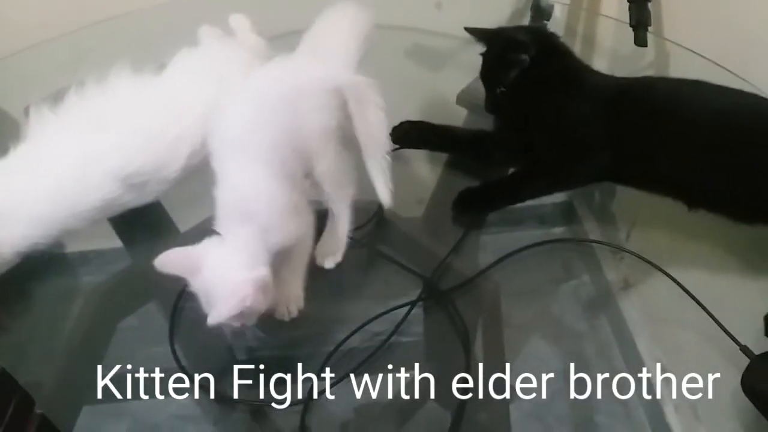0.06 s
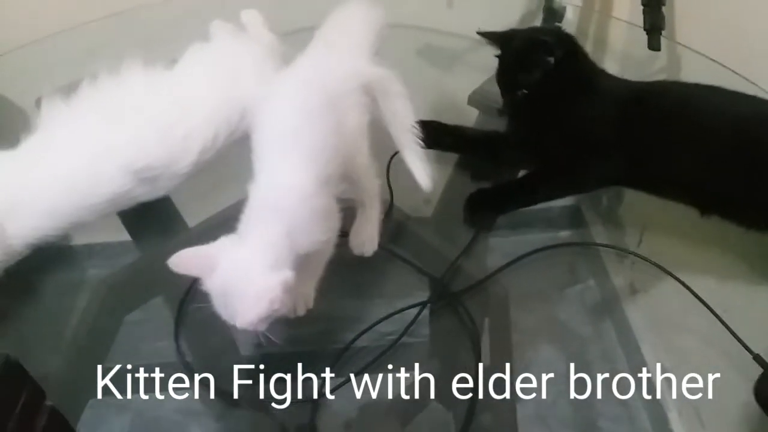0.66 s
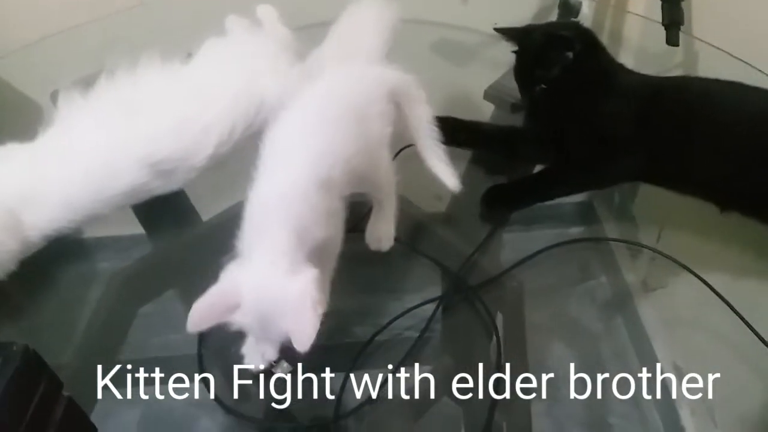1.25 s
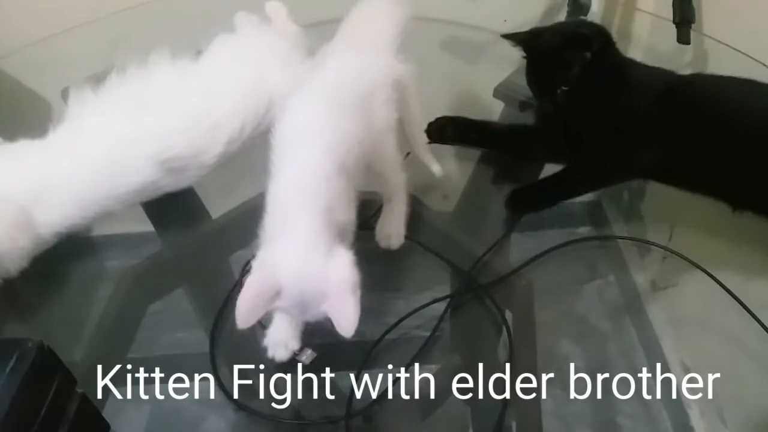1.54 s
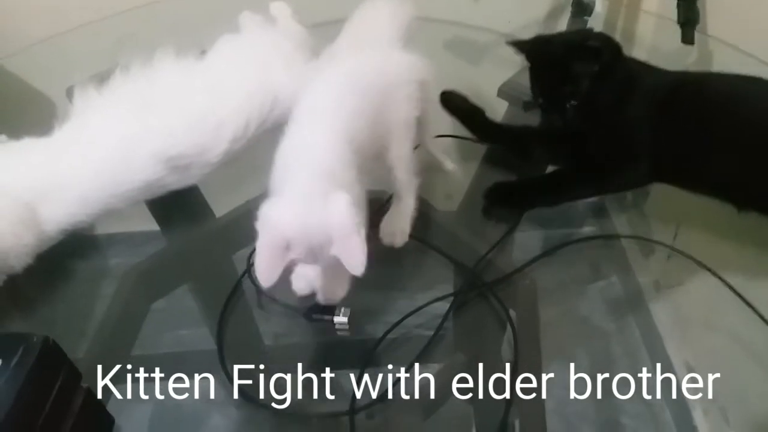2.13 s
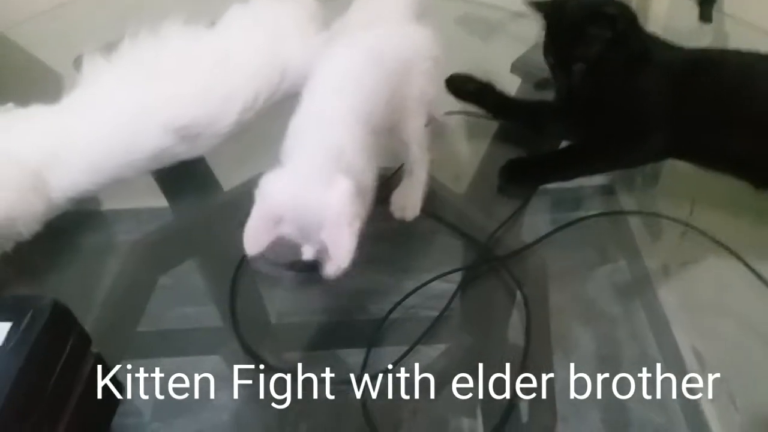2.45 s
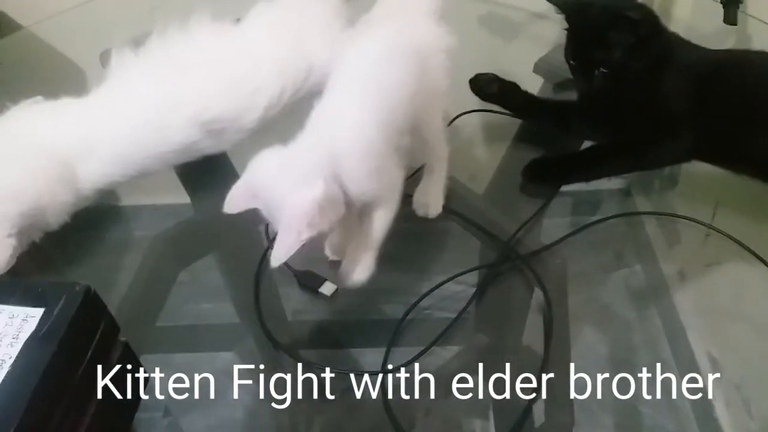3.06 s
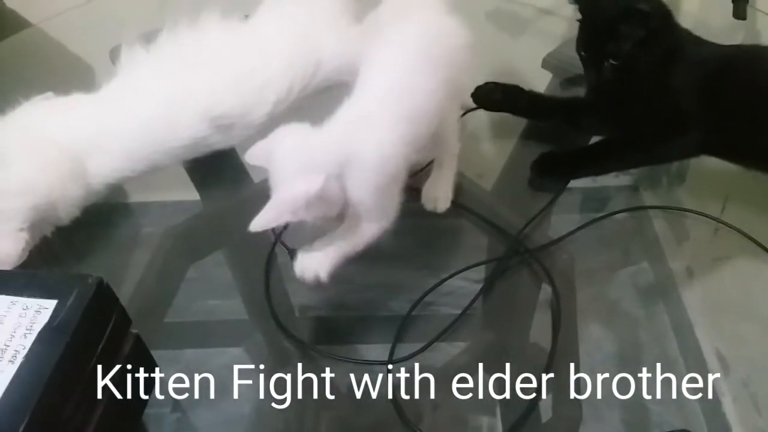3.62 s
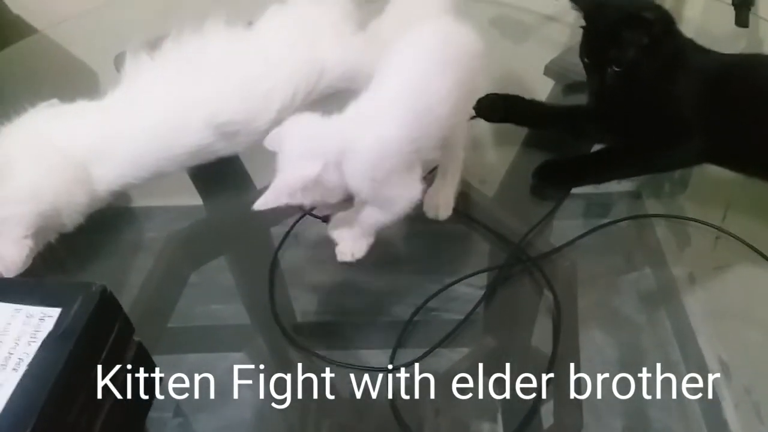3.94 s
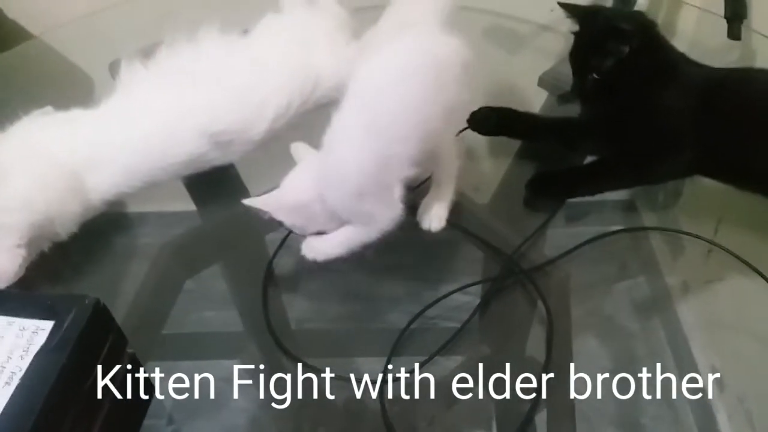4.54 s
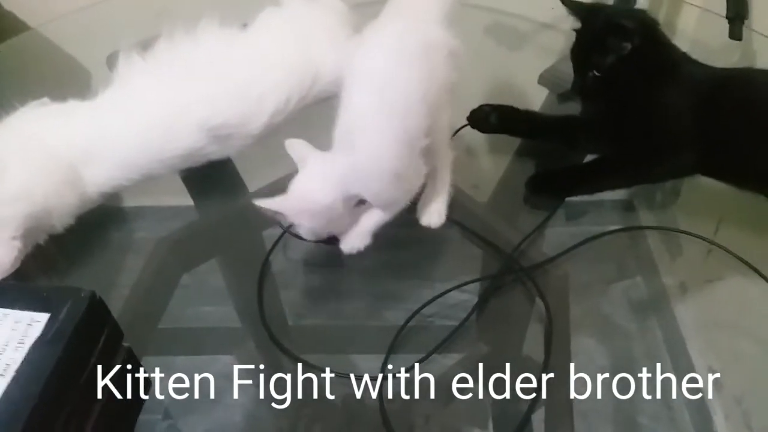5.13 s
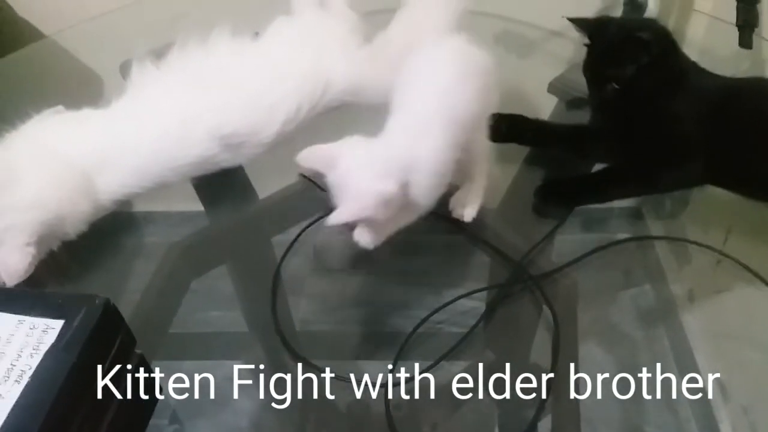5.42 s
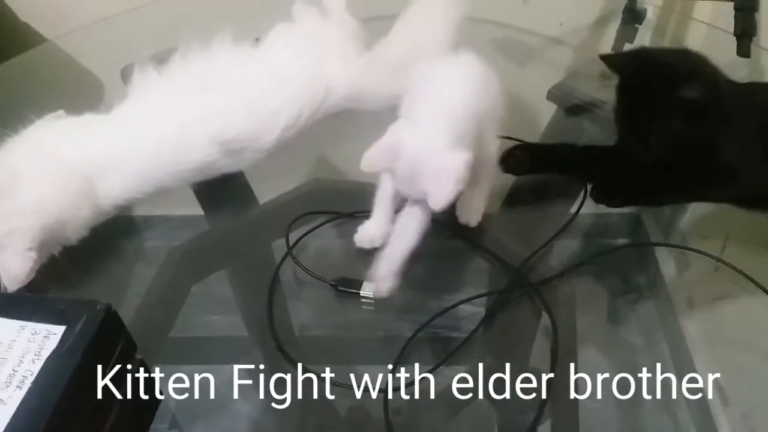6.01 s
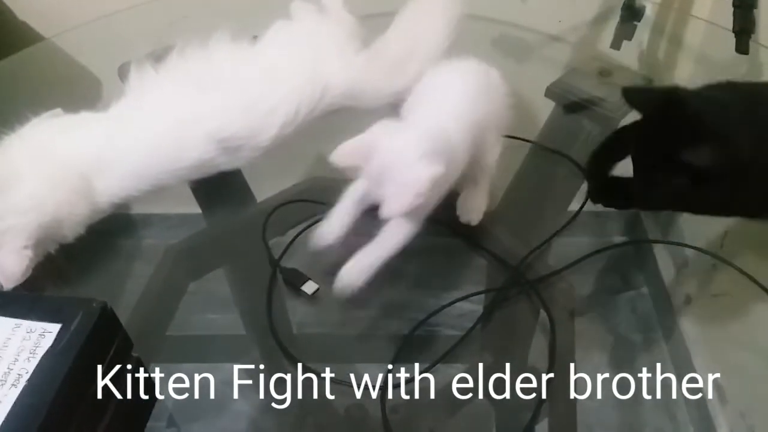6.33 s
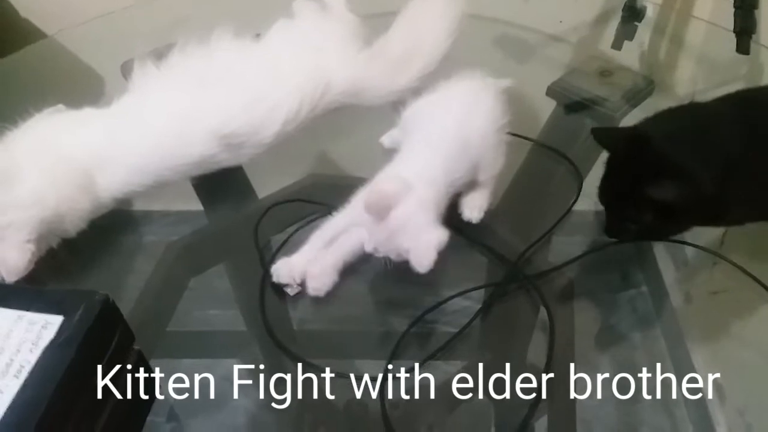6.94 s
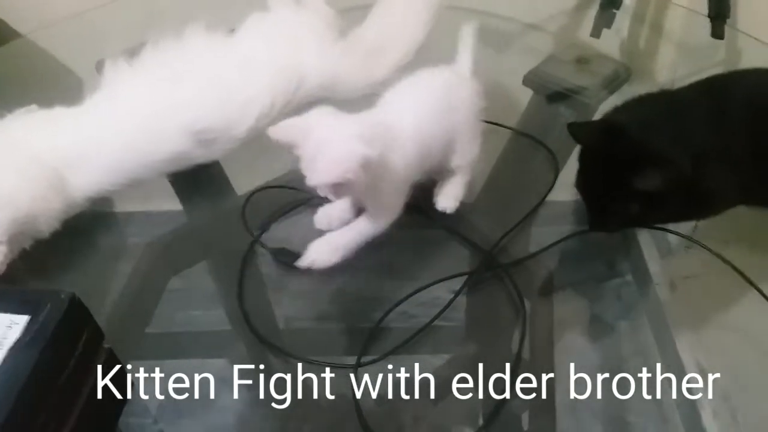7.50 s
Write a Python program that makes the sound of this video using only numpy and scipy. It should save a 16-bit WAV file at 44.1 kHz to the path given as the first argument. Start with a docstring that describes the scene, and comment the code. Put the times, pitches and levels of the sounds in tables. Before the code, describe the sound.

Scattered sharp taps and thin metallic pings on a glass tabletop, with soft kitten paw thuds and a fan blowing behind.

```python
"""A small, hard room, where a kitten bats the metal plug of a cable about on a glass table. The plug lands once
with a loud clack, is nudged a few times, then drops and bounces with a thin ring. Every tap is a chattering
knock and a click that set the glass top ringing, over a low thump. Paws thud softly on the table; behind it all
a fan blows and hums."""
import sys
import numpy as np
from scipy import signal
from scipy.fft import rfft, irfft, next_fast_len
from scipy.io import wavfile
from scipy.ndimage import map_coordinates

SR = 44100
rng = np.random.default_rng(int(sys.argv[2]) if len(sys.argv) > 2 else 0)


def unload_wav(signal):
    """Save mono or channel-first audio to the path in sys.argv[1] as 16-bit WAV at rate SR, clipped to [-1, 1]."""
    wavfile.write(
        sys.argv[1],
        SR,
        np.round(np.clip(np.atleast_2d(signal).T, -1, 1) * 32767).astype(np.int16),
    )


N = 342330

# The plug's taps, each coloured by where and how it lands. Each row: start in seconds, strength in dB,
# bass, middle, presence, top and knock trims in dB, knock pitch ratio, loss per chatter contact in dB,
# body level in dB, glass ring time (t60) in seconds.
PLUG_TAPS = [(1.3886, -21.5, 1.5, -3.5, 5.5, 2.3, -0.5, 0.89, 1, -29, 0.38),
             (1.446, -34, -4, -3, 3, -13, -4, 1, 1, -49, 0.38),
             (2.182, -45.5, 7.5, 3.5, -12, -4.5, 1.5, 0.86, 5, -58, 0.21),
             (2.9405, -46.5, 6, 4, -7, -4.5, 5, 0.7, 1.6, -55, 0.29),
             (3.337, -49, 6.5, 7.5, 8, 0.5, -1.5, 0.69, 4, -58, 0.23),
             (4.5936, -48, 9.5, 9.5, 5, 2, 6.5, 0.68, 8, -47, 0.24),
             (4.628, -54.5, 9, -5, 3, -3, -6, 0.9, 3, -56, 0.17),
             (4.808, -59, 7.5, 8.5, -6.5, 0, -1, 0.8, -1, -66, 0.17),
             (5.916, -40, 3.5, 3, 11.5, 7.5, 7.5, 0.8, 4.5, -61, 0.51),
             (6.011, -44, 10, 0, -1, 6, -7, 0.98, 4, -64, 0.35),
             (6.016, -37, 8, 2, 7, 3.5, -4, 0.76, -2.5, -39, 0.37),
             (6.085, -48.5, 12, -1, 9, 3, -3, 0.8, 6, -59, 0.22),
             (6.142, -44, 9, 2.5, -5.5, -3, 0, 0.95, -0.5, -54, 0.25)]
def plug_taps(out, t):
    """Mix in the plug's landings, nudges and bounces on the glass."""
    for start, *blow in PLUG_TAPS:
        add(out, start, tap(t, *blow))


FULL_BLOW_DB = -16.5
# Each pair: level in dB at a full blow, dB lost for every dB the tap is softer.
KNOCK_DB, KNOCK_LOSS = 10, 0.22  # relative to the glass ring
CLICK_DB, CLICK_LOSS = 8, 1.2  # relative to the glass ring
THUMP_DB, THUMP_LOSS = -41, 0.37
# The glass flexing on its frame. Each row: pitch in Hz, level in dB, t60 in seconds.
BODY_MODES = [(309.6, -8.5, 0.1), (433, -13, 0.24), (491.5, -8, 0.3), (708, -8.5, 0.32), (906.4, -12, 0.49),
              (1190, -3, 0.099)]
def tap(t, strength_db, bass_db, middle_db, presence_db, top_db, knock_db, pitch, loss_db, body_db, t60):
    """One blow: a hard one clicks and knocks, a soft one mostly stirs the lower modes of the glass."""
    soft_db = FULL_BLOW_DB - strength_db
    tone = [(500, bass_db), (900, bass_db / 2), (1100, middle_db), (1480, middle_db),
            (1750, 0), (2800, 0), (4100, presence_db), (4700, presence_db), (6000, top_db)]
    ring = table_ring(t, t60)
    clack = amp(KNOCK_DB + knock_db - KNOCK_LOSS * soft_db) * knock(t, pitch, loss_db)
    contact = filtered(ring + clack, lambda hz: amp(along(tone, hz)))
    contact += amp(CLICK_DB - CLICK_LOSS * soft_db) * metal_click(t)
    thump = amp(THUMP_DB - THUMP_LOSS * soft_db) * low_thump(t)
    body = amp(body_db) * partials(BODY_MODES, t, attack=0.0006)
    return amp(strength_db) * contact + thump + body


# The tone of the dead knock. Each row: frequency in Hz, spectral level in dB.
KNOCK_SPECTRUM = [(45, -48), (90, -20), (200, -36), (400, -6), (1200, -17), (1850, 11), (2350, 15.5),
                  (3200, -6.5), (4500, -9.5), (6000, -42), (8200, -20), (10500, -16), (13000, -29)]
def knock(t, pitch, loss_db, gap_s=0.0034, contact_t60=0.028, valley_db=-8, count=5):
    """The plug chatters on the glass, each contact loss_db weaker; a blunter contact knocks lower."""
    def colour(hz):
        peaks = sum(cluster(hz, centre, 0.32 * width) for centre, width, _ in GLASS_CLUSTERS)
        return amp(along(KNOCK_SPECTRUM, hz / pitch)) * (amp(valley_db) + peaks)

    starts = np.cumsum(gap_s * rng.uniform(0.685, 1.1, count))
    since = np.maximum(t - (starts - starts[0])[:, None], 0)
    gains = amp(-loss_db * np.arange(count))[:, None]
    contacts = gains * fade(since, contact_t60) * (1 - np.exp(-since / 0.00051))
    return shaped_noise(colour, np.linalg.norm(contacts, axis=0))


def metal_click(t, delay_s=0.0025):
    """Metal meeting glass edge-on gives a very short, bright click, alike left and right."""
    click = burst(lambda hz: cluster(hz, centre_hz=12550, half_width_hz=2100), t, t60=0.0074, attack=1e-4)
    return np.roll(click[0], int(delay_s * SR))


# The glass top's clusters of close modes. Each row: centre in Hz, half-width in Hz, level in dB.
GLASS_CLUSTERS = [(325, 55.5, -15.5), (408, 14, -18.5), (500, 37, -9.5), (718, 48, -9), (906, 50, -3.5),
                  (1140, 39, -3), (1165.3, 60, 3), (1375, 35, -5.5), (1436, 27, 3.5), (1595, 35, -3.5),
                  (1678, 29, 3), (1725, 31, -1), (2040, 35, 1.5), (2081, 60, -1.5), (2320, 21, -14),
                  (2460, 38, -8.5), (2385, 70, -5), (2780, 108, -7.5), (2920, 43, -17), (3168, 49, -7),
                  (3266, 98, -18), (3340, 25, -37), (3600, 24, -12), (3665, 59, -23), (4026, 43, -17.5),
                  (4116, 39, -14.5), (4380, 27, -24), (4560, 39, -24), (4670, 35, -17), (4950, 50, -29),
                  (5020, 45, -20), (5110, 33, -22), (5270, 56, -26), (5550, 21, -24.5), (5620, 160, -23.5),
                  (5840, 31, -26), (6150, 64, -21.5), (6500, 21, -24.5), (6830, 36, -29), (6830, 43, -32)]
def glass_ring(t, t60, lead_db=-14, wash_db=3.2, scatter_db=9.0):
    """One mode leads each cluster over a wash of neighbours; the spot struck sets its pitch and level."""
    def neighbours(hz):
        powers = ((amp(db) * cluster(hz, centre, width)) ** 2 for centre, width, db in GLASS_CLUSTERS)
        return np.sqrt(sum(powers))

    spots = rng.uniform(-1.057, 1, (len(GLASS_CLUSTERS), 2))
    modes = [(hz + shift * width / 4, db + scatter_db * lift, t60)
             for (hz, width, db), (shift, lift) in zip(GLASS_CLUSTERS, spots)]
    leads = amp(lead_db) * partials(modes, t, attack=0.0015)
    return leads + amp(wash_db) * burst(neighbours, t, t60, attack=0.00044)


# The span of the glass's faint high modes: lowest and highest pitch in Hz.
SHIMMER_SPAN = (6470, 12180)
def shimmer(t, t60, count=30):
    """The glassy clink: separate high modes, a fresh set wherever the plug lands."""
    places = (np.arange(count) + rng.random(count)) / count
    modes = [(hz, 0, t60) for hz in np.interp(places, [0, 1], SHIMMER_SPAN)]
    return partials(modes, t, attack=0.00092) / np.sqrt(count)


# The tone of the room's echo. Each row: frequency in Hz, spectral level in dB.
ECHO_SPECTRUM = [(50, -25.5), (200, -2.5), (320, 8.5), (500, 3.5), (1200, 3), (2000, 2), (3500, -26),
                 (5000, -30), (6200, -21), (8000, -13.5), (10500, -15), (13000, -22)]
def table_ring(t, t60, echo_db=-15, shimmer_db=-27):
    """The tail of a tap: ringing glass, its shimmer and the echo off hard walls."""
    echo = burst(lambda hz: amp(along(ECHO_SPECTRUM, hz)), t, t60=0.52, attack=0.00074)
    return glass_ring(t, t60) + amp(shimmer_db) * shimmer(t, t60) + amp(echo_db) * echo


def low_thump(t):
    """Each tap comes with a low, round thump."""
    return burst(lambda hz: cluster(hz, centre_hz=161, half_width_hz=92), t, t60=0.3, attack=0.0093)


# Contacts that set the plug ringing. Each row: start in seconds, level in dB, t60 in seconds.
PLUG_PINGS = [(1.3888, -40, 0.42), (3.337, -61, 0.19), (4.592, -48.5, 0.23), (5.9146, -40.5, 0.88),
              (6.016, -33, 0.27), (6.142, -52, 0.27)]
def plug_pings(out, t, choke_t60=0.2):
    """Mix in the plug's free ringing; each new ping chokes what is left of the earlier ones."""
    starts = np.array([start for start, _, _ in PLUG_PINGS])
    for start, db, t60 in PLUG_PINGS:
        later = starts[starts > start] - start
        choked_s = np.maximum(t - later[:, None], 0).sum(axis=0)
        add(out, start, amp(db) * plug_ring(t, t60) * fade(choked_s, choke_t60))


# The metal plug's modes. Each row: pitch in Hz, level in dB, share of the ping's ring time.
PLUG_MODES = [(2293, -21, 0.54), (2419, 4.5, 1), (2557, -10.5, 0.52), (2805, -14.5, 0.99),
              (3220, -15, 0.78), (3700, -16, 0.88), (4040, -16.5, 0.62), (4580, -17.5, 0.92),
              (5100, -24, 0.7), (6310, -20.5, 0.77), (7340, -29, 0.6), (9300, -30, 0.86),
              (10200, -29, 0.88)]
def plug_ring(t, t60, rattle_db=-7, rattle_hz=70, left_db=5.5):
    """A thin ping, roughened as the plug trembles on the glass; it reaches the left more directly."""
    ping = partials([(hz, db, share * t60) for hz, db, share in PLUG_MODES], t, attack=0.0021)
    sidebands = lambda hz: sum(amp(db) * cluster(hz, centre, rattle_hz) for centre, db, _ in PLUG_MODES)
    rattle = burst(sidebands, t, t60=0.65 * t60, attack=0.0011)
    return (ping + amp(rattle_db) * rattle) * pan(left_db)


# Ticks on the light nudges. Each row: start in seconds, level in dB.
NUDGE_TICKS = [(2.184, -66), (2.941, -68), (3.337, -71)]
# The thin metal edge's resonances. Each row: centre in Hz, half-width in Hz, level in dB.
EDGE_BANDS = [(5970, 460, 0.5), (6680, 140, -3), (9900, 900, -4)]
def edge_ticks(out, t):
    """Mix in the crisp ticks of the plug's sharp edge catching the glass."""
    edge = lambda hz: sum(amp(db) * cluster(hz, centre, width) for centre, width, db in EDGE_BANDS)
    for start, db in NUDGE_TICKS:
        add(out, start, amp(db) * burst(edge, t, t60=0.11, attack=0.0007))


# Paws coming down. Each row: start in seconds, level in dB.
PAW_FALLS = [(1.547, -52.5), (4.612, -58), (4.629, -53.5), (5.951, -54), (6.079, -52.5)]
# The table's low modes. Each row: pitch in Hz, level in dB, t60 in seconds.
THUD_MODES = [(135, -11, .2), (187, 6, 0.26), (303, 1, 0.13), (399, 7, .09)]
def paw_thuds(out, t):
    """Mix in the soft paws, which stir only the table's low modes."""
    for start, db in PAW_FALLS:
        add(out, start, amp(db) * partials(THUD_MODES, t, attack=0.0015))


# The fan's rush of air. Each row: frequency in Hz, spectral level in dB.
AIR_SPECTRUM = [(15, -80), (25, -26), (86, -14.5), (114, -7), (148, -11), (192, -3), (263, -10), (316, -6),
                (361, -7.5), (494, -6.5), (658, -11.5), (791, -11), (1050, -10.5), (1600, -14.5),
                (6580, -42.5), (13000, -43.5)]
# The fan's hums. Each row: centre in Hz, full width in Hz, level in dB.
HUM_BANDS = [(59, 5, -85), (122, 13.7, -69.5), (185, 19.6, -66.5), (199.3, 7.1, -66.5), (240.8, 9.3, -71.5),
             (321, 15, -69.5), (498, 9.8, -75.5)]
def fan(air_db=-54, swell_db=1.1, swells_per_s=5, left_db=1.0):
    """A steady bed of moving air, with narrow hums that swell and sink together."""
    size = next_fast_len(N)
    air = amp(air_db) * diffuse(lambda hz: amp(along(AIR_SPECTRUM, hz)), size)
    bands = lambda hz: sum(amp(db) * unit(cluster(hz, centre, width / 2))
                           for centre, width, db in HUM_BANDS)
    hum_rms = np.linalg.norm([amp(db) for _, _, db in HUM_BANDS])
    hum = hum_rms * diffuse(bands, size)
    swell = amp(swell_db * wobble(swells_per_s))
    return (air[:, :N] + swell * hum[:, :N]) * pan(left_db)


# The room's stereo width. Each row: frequency in Hz, left-right correlation.
STEREO_LIKENESS = [(60, 0.94), (130, 1), (280, 0.9), (610, 0.66), (1330, -0.29), (2890, 0.057),
                   (13000, -0.014)]
def phase_gap(hz):
    """Radians between left and right: nearly in step in the bass, wide apart in the treble."""
    return np.arccos(np.clip(along(STEREO_LIKENESS, hz), -1, 1))


def partials(modes, t, attack):
    """Clean decaying stereo sines from rows of pitch in Hz, level in dB and t60 in seconds."""
    phases = rng.uniform(0, 2 * np.pi, len(modes))
    ring = sum(amp(db) * fade(t, t60) * np.sin(2 * np.pi * hz * t + phase + [[0], [phase_gap(hz)]])
               for (hz, db, t60), phase in zip(modes, phases))
    return np.sqrt(2) * ring * (1 - np.exp(-t / attack))


def diffuse(colour, size):
    """Coloured stereo noise of rms 1, narrow in the bass and wide in the treble."""
    hz = np.fft.rfftfreq(size, 1 / SR)
    turn = phase_gap(hz) / 2
    phases = np.exp(2j * np.pi * rng.random((2, len(hz))))
    mid, side = irfft(phases * colour(hz) * [np.cos(turn), np.sin(turn)], size)
    return unit(np.array([mid + side, mid - side]))


def shaped_noise(colour, envelope):
    """Coloured noise under an envelope, carrying exactly that envelope's energy."""
    return unit(diffuse(colour, len(envelope)) * envelope) * np.sqrt(np.mean(envelope ** 2))


def burst(colour, t, t60, attack):
    """A dense, noisy ring that swells and dies; times in seconds."""
    return shaped_noise(colour, fade(t, t60) * (1 - np.exp(-t / attack)))


def cluster(hz, centre_hz, half_width_hz):
    """Gain of a bunch of close resonances, with steep skirts."""
    return 1 / (1 + ((hz - centre_hz) / half_width_hz) ** 4)


def filtered(x, response):
    """Equalise x with a gain curve over frequency."""
    n = x.shape[-1]
    size = next_fast_len(n + SR // 4)
    return irfft(rfft(x, size) * response(np.fft.rfftfreq(size, 1 / SR)), size)[..., :n]


def along(points, hz):
    """Read a curve of (Hz, value) points on a log axis."""
    freqs, values = np.transpose(points)
    return np.interp(np.log(hz + 1), np.log(freqs + 1), values)


def fade(t, t60):
    """Exponential decay by 60 dB in t60 seconds."""
    return np.exp(-np.log(1000) * t / t60)


def wobble(rate):
    """A smooth random curve with rate knots a second."""
    knots = rng.standard_normal(int(N * rate / SR) + 4)
    return map_coordinates(knots, [np.arange(N) * rate / SR])


def amp(db):
    """Decibels to gain."""
    return 10 ** (np.asarray(db) / 20)


def pan(left_db):
    """Stereo gains with the left louder by left_db."""
    return amp(np.array([[0.5], [-0.5]]) * left_db)


def unit(x):
    """Scale each channel to rms 1."""
    return x / np.sqrt(np.mean(x ** 2, axis=-1, keepdims=True) + 1e-20)


def add(out, start, sound):
    """Mix a sound in at start seconds."""
    out[:, round(start * SR):][:, :sound.shape[1]] += sound


# The shading of the far side above the bass. Each row: frequency in Hz, multiple of the leftward pan.
FAR_SIDE_SHADE = [(600, 0.1), (1200, 0.19), (1900, 1), (2500, 0.74), (7500, 1.17), (13000, 0.64)]
def scene(left_db=4.5):
    """The kitten's game off to the left, over the bed of the fan."""
    t = np.arange(SR // 2) / SR  # half a second for each hit
    table = np.zeros((2, N))
    plug_pings(table, t)
    plug_taps(table, t)
    edge_ticks(table, t)
    paw_thuds(table, t)
    return filtered(table, lambda hz: pan(left_db * along(FAR_SIDE_SHADE, hz))) + fan()


def record(dry, cutoff_hz=13000):
    """A steep low-pass takes off the very top."""
    return signal.sosfilt(signal.butter(32, cutoff_hz, fs=SR, output="sos"), dry)


dry = scene()
out = record(dry)
unload_wav(out)
```